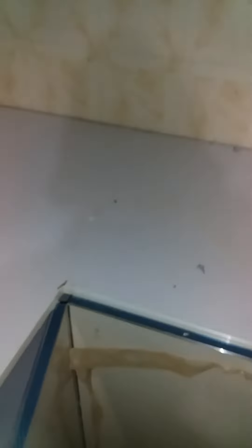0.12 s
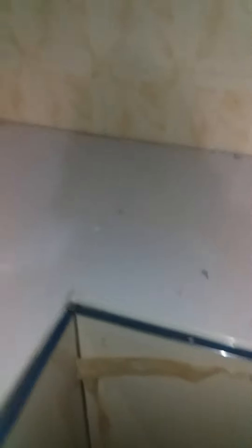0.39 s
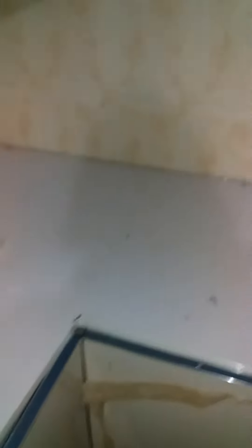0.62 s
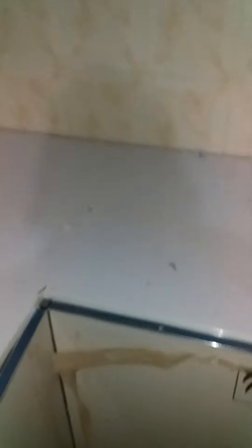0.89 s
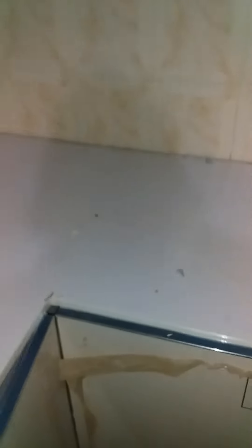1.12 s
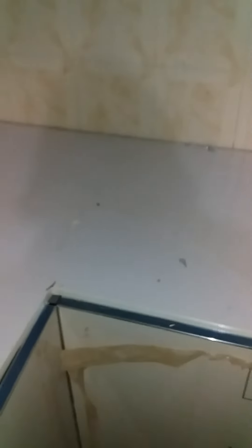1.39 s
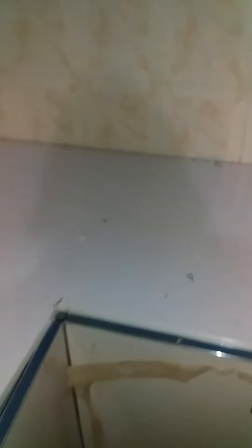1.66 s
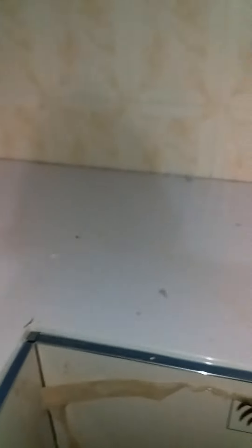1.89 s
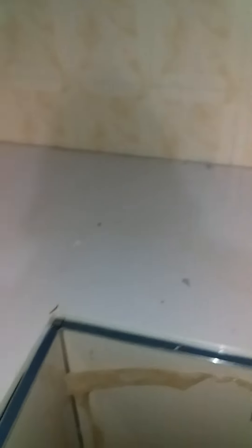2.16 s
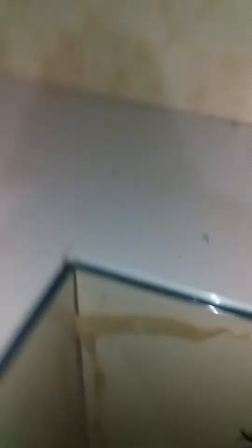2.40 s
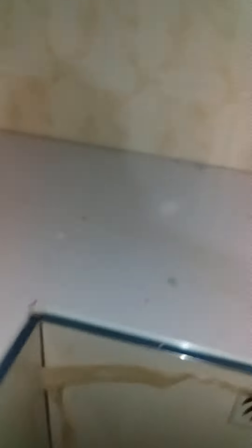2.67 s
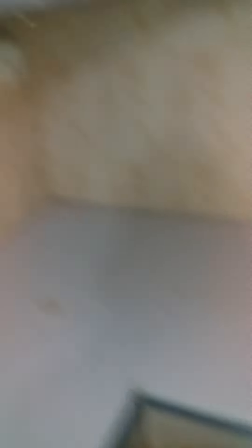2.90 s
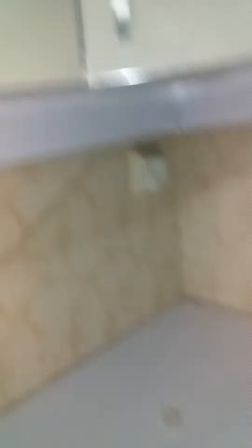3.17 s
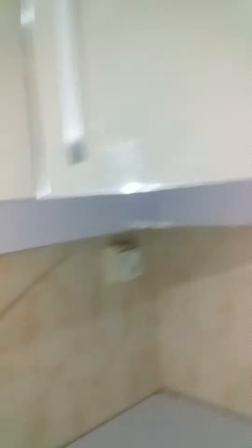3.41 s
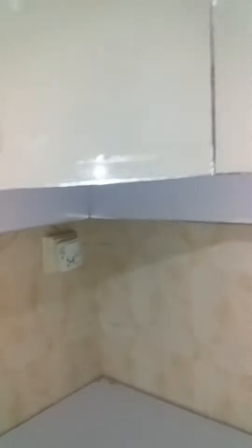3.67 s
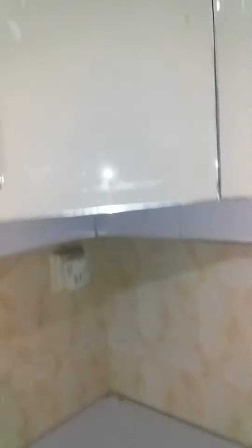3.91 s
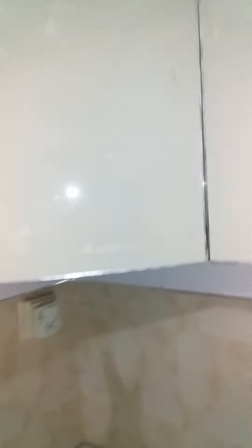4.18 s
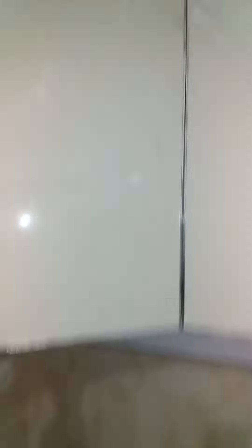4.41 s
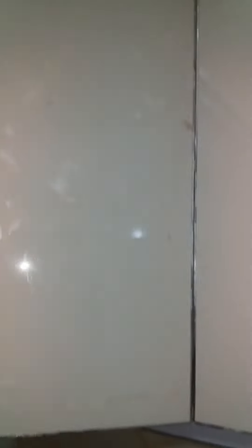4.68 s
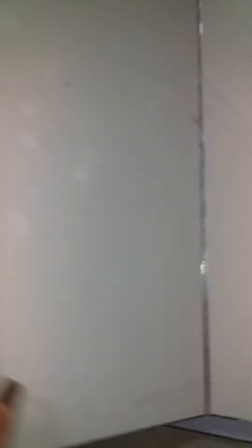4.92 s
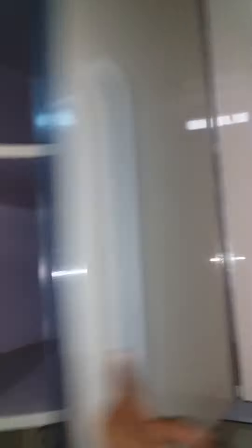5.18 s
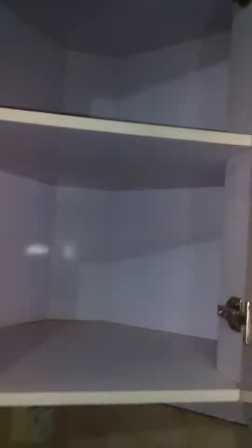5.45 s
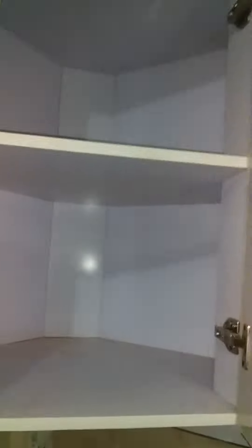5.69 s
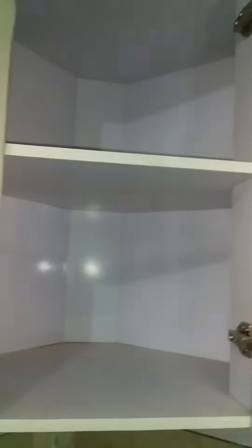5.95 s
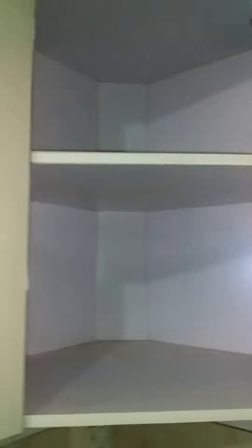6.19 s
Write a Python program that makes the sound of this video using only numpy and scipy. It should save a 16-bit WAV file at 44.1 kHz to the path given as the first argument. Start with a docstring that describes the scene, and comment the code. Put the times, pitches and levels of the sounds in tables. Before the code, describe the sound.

Cabinet doors knock hollowly in a bare kitchen, loud blows early, then cloth rustling with squeaks, light catch clicks and a final close rub.

```python
"""Cabinet doors knock shut and pop open in a bare, hard-walled kitchen, heard at one microphone.
Each blow is a burst of noise spread by the room, a hard bright edge, and decaying sine modes of the hollow box.
Between blows clothes and feet rustle close by, as shaped noise under rounded swells. Small things click (short
rings with a crack) and squeak (brief unsteady sines). A low sine wavers, and faint steady noise is the room's air."""
import sys
import numpy as np
from scipy import signal
from scipy.fft import rfft, irfft, next_fast_len
from scipy.io import wavfile
from scipy.ndimage import uniform_filter1d, map_coordinates

SR = 44100
rng = np.random.default_rng(int(sys.argv[2]) if len(sys.argv) > 2 else 0)


def field_ratio(decibels):
    """Amplitude ratio for a level in dB (20 dB per decade); scalars and array-likes work."""
    return 10 ** (np.asarray(decibels, dtype=float) / 20)


def persist_wave(psi):
    """Save psi, clipped to +-1, as 16-bit WAV."""
    counts = np.round(np.clip(psi, -1, 1) * 32767).astype(np.int16)
    wavfile.write(sys.argv[1], SR, np.atleast_2d(counts).T)


N = 278712  # length in samples


def unit(x):
    """Scale a sound to rms 1."""
    return x / np.sqrt(np.mean(x ** 2) + 1e-20)


def along(points, hz):
    """Read (Hz, value) points on a log frequency axis."""
    point_hz, value = np.transpose(points)
    return np.interp(np.log(hz + 1), np.log(point_hz + 1), value)


def wobble(rate):
    """A smooth random curve with rate knots a second."""
    knots = rng.standard_normal(int(N * rate / SR) + 4)
    return map_coordinates(knots, [np.arange(N) * rate / SR])


def filtered(x, response):
    """Multiply the spectrum of x by a response of frequency."""
    size = next_fast_len(x.shape[-1] + 8192)
    spectrum = rfft(x, size) * response(np.fft.rfftfreq(size, 1 / SR))
    return irfft(spectrum, size)[..., :x.shape[-1]]


def rush(colour, patchy_db, grainy_db):
    """Coloured noise of rms 1 with patches of random gain and a grainy fine envelope."""
    grain = field_ratio(grainy_db * wobble(400)) * rng.standard_normal(N)
    z = signal.stft(grain, nperseg=512)[2]
    field = uniform_filter1d(rng.standard_normal(z.shape), size=5, axis=0)  # across frequency
    field = uniform_filter1d(field, size=8, axis=1)  # across time
    patchy = signal.istft(z * field_ratio(patchy_db * unit(field)), nperseg=512)[1][:N]
    return unit(filtered(patchy, lambda hz: field_ratio(along(colour, hz))))


def swells(peak_s, db, rise_s, fall_s):
    """Gain of rounded swells added in power; rise and fall span 20 dB, their signs ignored, and 0 is silent."""
    late = np.arange(0, N + 64, 64) / SR - peak_s[:, None]  # one point every 64 samples
    rising = -late / np.abs(rise_s)[:, None]
    falling = late / np.abs(fall_s)[:, None]
    part = np.where(late < 0, rising, falling)
    power = np.sum(field_ratio(db[:, None] - 20 * part ** 1.236) ** 2, axis=0)  # the exponent rounds the top
    return np.interp(np.arange(N), np.arange(len(power)) * 64, np.sqrt(power))


def add(track, s, sound):
    """Mix a sound into the track at time s."""
    part = track[round(s * SR):][:len(sound)]
    part += sound[:len(part)]


# The kitchen's air and the microphone itself. Each row: frequency in Hz, relative level in dB.
AIR_COLOUR = [(15, -39.5), (25, -9.5), (82, 9.5), (144, -6.5), (307, -4.5), (572, -21), (1320, -9.5),
              (1820, -12.5), (2150, -7), (3130, -29), (8270, -17), (10800, -46.5), (15800, -25)]


def room_air():
    """Room air and microphone noise: steady coloured noise without patches or grain."""
    return field_ratio(-63.5) * rush(AIR_COLOUR, patchy_db=0, grainy_db=0)


# Swells of the low tone. Each row: peak time in seconds, pitch in Hz, level in dB,
# rise in seconds over 20 dB, fall in seconds over 20 dB.
TONE_SWELLS = [(3.23, 254, -51, 0.055, 0.25), (3.445, 248, -53.5, 0.11, 0.15),
               (3.72, 246.5, -52, 0.13, .15), (3.81, 248.5, -46.5, 0.14, 0.099),
               (4.025, 251.5, -57, .15, .04), (4.32, 251.8, -42, 0.23, 0.13),
               (4.62, 251.7, -47, .24, 0.065), (4.8, 250, -46.5, 0.044, 0.084)]


def low_tone():
    """One soft sine gliding between the listed pitches, with wavering level and phase."""
    peak_s, hz, db, rise_s, fall_s = np.transpose(TONE_SWELLS)
    cycles = np.cumsum(np.interp(np.arange(N) / SR, peak_s, hz)) / SR
    gain = swells(peak_s, db, rise_s, fall_s) * field_ratio(0.7 * wobble(30))
    return np.sqrt(2) * gain * np.sin(2 * np.pi * cycles + 0.5 * wobble(25))


# Brief narrow tones inside the rubbing. Each row: middle in seconds, pitch in Hz, peak level in dB,
# length in seconds between the points at 1/e of the peak.
SQUEAK_TONES = [(2.955, 1230, -41.5, 0.046), (3.014, 1413, -44, 0.06), (3.1, 1144, -41, 0.046),
                (3.376, 840, -41.5, 0.053), (3.454, 896, -50, 0.086), (4.156, 2050, -40.5, 0.055),
                (4.32, 445, -45, 0.23), (4.432, 178.5, -46, 0.069), (4.536, 162, -41.5, 0.16),
                (5.64, 232, -58.5, 0.15), (5.958, 1744, -37, 0.081), (6.116, 228.7, -45, .06),
                (6.178, 232, -44, 0.075)]


def squeaks():
    """Sines that swell and fade in a smooth bell, the phase unsteady."""
    out, t = np.zeros(N), np.arange(N) / SR
    for middle_s, hz, db, length_s in SQUEAK_TONES:
        bell = np.exp(-(2 * (t - middle_s) / length_s) ** 2)
        out += field_ratio(db) * bell * np.sin(2 * np.pi * hz * t + 0.85 * wobble(60))
    return out


# Steps and shifts of weight on the floor. Each row: peak time in seconds, scuff level in dB,
# rumble level in dB relative to the scuff, fall in seconds over 20 dB (sign ignored, 0 is silent).
FOOT_STEPS = [(0.005, -41.5, -1, 0.22), (.07, -48.5, -1.5, 0), (.17, -59, -15, 1.8), (.21, -67, -2, .04),
              (.74, -41.5, -1.5, 0.2053), (.89, -66, 4, 0.5), (1.257, -48.5, 10.5, 0.07),
              (1.77, -65, 2, -0.8), (1.83, -61, 9, 1.1), (2.58, -45, -10.5, 0.07), (2.87, -55.5, 2, 1),
              (3.14, -40.5, -6, 0.2), (3.25, -41.5, -13, -0.03), (3.37, -49.5, 2, .18), (3.54, -68, 8, 0.8),
              (3.66, -62, -1.5, 0.4), (3.79, -55, 1, 0.5), (3.9, -68, 22, 0), (4.03, -60.5, 5.5, 0.7),
              (4.08, -48, -6, 0.07), (4.31, -49.5, 1, 0.25), (4.43, -43.5, -12, 0.07),
              (4.56, -46.5, 3, 0.1), (4.67, -48.5, 3, 0.04), (4.79, -45.5, -7, 0.4),
              (4.93, -46, -13, -0.36), (5.004, -40.5, 2, -0.07), (5.08, -49.5, 3, 0.04),
              (5.37, -59.5, 9.5, 0.5), (5.52, -73, 16, -0.5), (5.62, -59.5, -3, -0.4),
              (5.869, -69, 10.5, 0.6), (5.96, -41.5, -3, 0.09), (6.1, -43, -7, 0.24),
              (6.29, -52.5, -11, 0.96)]
# Colour of the scuffing soles. Each row: frequency in Hz, relative level in dB.
SCUFF_COLOUR = [(76, -29), (130, -2.5), (248, 0.5), (280, 0), (447, -8), (600, -19.5), (780, -38.5),
                (1320, -120)]
# Colour of the rumble of steps and handling. Each row: frequency in Hz, relative level in dB.
RUMBLE_COLOUR = [(18, -57), (30, -22), (42, -22), (59, -1), (75, 3.5), (140, -17), (180, -36), (310, -120)]


def feet():
    """Feet scuff as mid-low noise, and steps and handling rumble below on the same swells."""
    peak_s, db, rumble_db, fall_s = np.transpose(FOOT_STEPS)
    rise_s = 0.63 * fall_s
    scuff = swells(peak_s, db, rise_s, fall_s) * rush(SCUFF_COLOUR, patchy_db=3.5, grainy_db=0.6)
    rumble_gain = swells(peak_s, db + rumble_db, rise_s, fall_s)
    return scuff + rumble_gain * rush(RUMBLE_COLOUR, patchy_db=-0.9, grainy_db=-1.5)


# Strokes of cloth close by. Each row: peak time in seconds, rustle level in dB,
# fine hiss level in dB relative to the rustle, rise in seconds over 20 dB, fall in seconds over 20 dB.
CLOTH_STROKES = [(0.02, -50, -6.5, 0.12, 0.32), (.81, -54.5, -3, .15, 0.21), (.946, -56, 6.5, 0.065, 0.1),
                 (1.2, -54.5, 4, 0.056, 0.13), (1.8, -73, 11.5, 0.054, 0.11), (2.6, -68, 8.5, 0.16, 0.21),
                 (2.82, -49.5, -1.5, 0.17, 0.25), (2.885, -46.5, -14, .04, .03),
                 (2.98, -40, -5.5, 0.12, 0.38), (3.14, -41.5, -6, 0.41, 0.39),
                 (3.33, -44, -6.5, 0.24, 0.24), (3.57, -61.5, 9, 0.056, 0.29),
                 (3.8, -47.5, -0.3, .25, 0.32), (4.13, -38.5, -3.5, 0.22, 0.37),
                 (4.33, -42, -0.9, 0.23, 0.17), (4.57, -52, -2, 0.14, 0.26), (4.67, -56.5, 7.5, 0.19, 0.19),
                 (4.96, -45.5, -12, 0.067, 0.098), (5.03, -47, -9, .1, 0.22), (5.33, -63, -0.5, .1, 0.3),
                 (5.6, -68.5, 1, .15, 0.17), (5.888, -51.5, -11, 0.0094, .1),
                 (5.953, -32.5, -8, 0.054, 0.14), (6.02, -40, -15, .08, 0.12), (6.1, -43, -11.5, .12, 0.25),
                 (6.22, -49.5, -13, 0.07, 0.22)]
# Colour of the cloth's body. Each row: frequency in Hz, relative level in dB.
RUSTLE_COLOUR = [(150, -36), (250, -10), (282, -16.5), (449, -6.5), (634, -7), (1080, -3.5), (2020, -8),
                 (2490, -13), (6000, -21.5), (7800, -48), (13200, -120)]
# Colour of the cloth's fine hiss. Each row: frequency in Hz, relative level in dB.
HISS_COLOUR = [(1760, -8.5), (3000, -4.5), (3750, -4.5), (4400, -4.5), (5200, -3.5), (7350, -5.5),
               (8340, -3.5), (10100, -19.5), (12500, -15.5), (15800, -21.5)]


def cloth():
    """Rubbing cloth: rustle and fine hiss are two noises that flutter together."""
    peak_s, db, hiss_db, rise_s, fall_s = np.transpose(CLOTH_STROKES)
    flutter = wobble(25.017)
    rustle_gain = swells(peak_s, db, rise_s, fall_s) * field_ratio(1.1 * flutter)
    hiss_gain = swells(peak_s, db + hiss_db, rise_s, fall_s) * field_ratio(1.2 * flutter)
    rustle = rustle_gain * rush(RUSTLE_COLOUR, patchy_db=2.5, grainy_db=0.5)
    return rustle + hiss_gain * rush(HISS_COLOUR, patchy_db=2.3, grainy_db=0.85)


# Hard edge of a contact, for doors and clicks alike. Each row: frequency in Hz, relative level in dB.
EDGE_COLOUR = [(1800, -20.5), (3000, 2.5), (5480, -5), (6060, -5.5), (6530, -8), (7900, -7), (10400, -27),
               (13100, -32.5), (15800, -36.5)]


def edge_colour_db(hz):
    """Hard surfaces meeting excite mostly the treble."""
    return along(EDGE_COLOUR, hz)


# Dry clicks of catches and small contacts. Each row: start in seconds, level in dB, pitch in Hz,
# life in cycles to 1/e, starting level of the crack in dB relative to the ring.
CLICKS = [(1.282, -38, 950, 6, -30), (1.533, -34, 1900, 6, -20), (2.237, -19, 1900, 4, -20),
          (2.344, -22, 1800, 6, -18), (2.351, -8, 2200, 7, -15), (2.535, -52, 9000, 3, 2),
          (2.553, -51, 11000, 3, 2), (2.783, -33, 1380, 2.5, 2), (2.797, -42, 2500, 2, 0),
          (2.815, -27, 1420, 2.5, -3), (2.883, -27, 480, 1.6, -5), (3.782, -37, 1510, 3.5, -3),
          (4.83, -27, 900, 6, -22), (4.872, -30, 520, 14, -30), (5.111, -25, 950, 7, -15),
          (5.193, -29, 2600, 4, -4)]


def ticks():
    """Dry clicks: a sine dying within a few cycles, with a crack of hard noise on top."""
    out, t = np.zeros(N), np.arange(SR // 10) / SR
    for s, db, hz, cycles, crack_db in CLICKS:
        ring = np.sin(2 * np.pi * hz * t) * np.exp(-t * hz / cycles) * (1 - np.exp(-t / 0.00035))
        crack = unit(filtered(rng.standard_normal(len(t)), lambda f: field_ratio(edge_colour_db(f))))
        crack *= field_ratio(crack_db - 60 * t / 0.0033)
        add(out, s, field_ratio(db) * (ring + crack))
    return out


# Reverberation of the bare kitchen. Each row: frequency in Hz, time to fall 60 dB in seconds.
ROOM_DECAY = [(400, 0.74), (1100, 0.53), (2900, 0.55), (7700, 0.46), (14000, 0.52)]


def in_room(t, response, contact_s, direct_db):
    """A short contact and the room's answer, each frequency dying at its own speed; rms 1 over the first 30 ms."""
    noise = filtered(rng.standard_normal(len(t)), response)
    hz, frame_s, z = signal.stft(noise, SR, nperseg=256)
    decay = field_ratio(-60 * frame_s / along(ROOM_DECAY, hz)[:, None])
    tail = signal.istft(z * decay, SR, nperseg=256)[1][:len(t)]
    build_up = 1 - np.exp(-t / 0.0018)  # echoes pile up
    direct = field_ratio(direct_db) * noise * field_ratio(-60 * t / contact_s) * (1 - np.exp(-t / 0.0036))
    sound = tail * build_up + direct
    return sound / np.sqrt(np.mean(sound[:round(0.03 * SR)] ** 2))


# Broad colour of the knock. Each row: frequency in Hz, relative level in dB.
KNOCK_COLOUR = [(240, -14.5), (400, 2), (559, -11), (637, -8.5), (705, -5), (908, -10), (985, -10),
                (1860, -7.5), (4500, -32.5), (5850, -47.5), (9900, -120)]


def door_knock(t):
    """The diffuse knock: noise of a short contact, spread by the room."""
    return in_room(t, lambda f: field_ratio(along(KNOCK_COLOUR, f)), contact_s=0.02, direct_db=-7)


def door_edge(t, edge_db):
    """The hard edge of the contact: a weak edge is also a dull one."""
    tilt_db = 0.97 * (max(edge_db, -35) + 25.5)  # per octave above 7 kHz

    def response(f):
        return field_ratio(edge_colour_db(f) + tilt_db * np.log2(np.maximum(f / 7000, 1)))
    return in_room(t, response, contact_s=0.0069, direct_db=6.5)


# Modes of door panel and hollow cabinet. Each row: frequency in Hz, relative level in dB,
# time to fall 60 dB in seconds.
BOX_MODES = [(64, 4, 0.63), (87.1, 3.5, 0.75), (112.6, -1, 0.68), (151.6, 3.5, 0.48), (170, -5.5, 0.82),
             (184.3, 5, 0.43), (210.6, 0, 0.48), (234, -1.5, 0.8), (259.4, -1, 0.69), (293, 3, 0.8),
             (328.8, 2.5, 0.64), (371, 0, 0.5), (428.8, 2.5, 0.43), (550, -6, 0.81), (633, -2, 0.4),
             (818, -3.5, 0.25), (916, 0, 0.55), (1028, -6, 0.22), (1124, -10.5, 0.7), (1347, -7, 0.53),
             (1500, -4, 0.51), (1560, -13, 0.76), (1655, -1.5, 0.38), (1870, -17.5, .4), (1905, -13, 0.42),
             (1900, -6.5, 0.22), (2207, -12, 0.65), (2343, -4.5, 0.43), (2485, -9.5, 0.79),
             (2916, -14, 0.4)]


def hollow_box(t, boom_db, thud_hz):
    """Decaying modes of box and panel set going together, and the door's own bend."""
    hz, level_db, t60 = np.transpose(BOX_MODES)[:, :, None]
    low = hz < 500
    thud_db = 3 + 0.44 * boom_db  # more boom brings more thud
    near_db = np.maximum(-25 * np.log2(hz / thud_hz) ** 2, -12)  # where the door is struck favours some modes
    reach_db = -1.2 * (boom_db + 5.5) * np.log2(hz / 80)  # a blow that shakes the whole box reaches deeper
    # boom below 130 Hz, thud below 500 Hz, panel above
    family_db = np.select([hz < 130, low], [boom_db + 4 + reach_db, thud_db + near_db], -11.5)
    strength_db = family_db + level_db + np.where(low, 1.2, 3.5) * rng.standard_normal(hz.shape)
    late = np.maximum(t - 0.005, 0)  # the edge touches first, the weight of the door lands after
    swell = 1 - np.exp(-(np.where(low, late, t) * hz) ** 2)  # a mode takes a cycle or two to speak
    first = 1 + 0.54 * np.exp(-t / 0.028)  # the wood itself dies quickly, the room carries on
    walk = uniform_filter1d(rng.standard_normal((len(hz), len(t))), size=30)
    walk = uniform_filter1d(walk, size=30)
    drift = 3.95 * (hz / 200) ** 0.597 * np.cumsum(walk, axis=1) / np.sqrt(SR)  # echoes blur each mode
    gain = field_ratio(strength_db - 60 * t / t60) * swell * first
    modes = np.sum(gain * np.sin(2 * np.pi * hz * t + drift), axis=0)
    flex = late * thud_hz / 1.6  # the door itself bends for a few cycles
    bend = np.e * flex * np.exp(-flex) * np.sin(2 * np.pi * thud_hz * t)
    return modes + field_ratio(thud_db + 8) * bend


# Door blows. Each row: start in seconds, level of the whole blow in dB, relative strength of the boom in dB,
# centre of the thud in Hz, relative strength of the hard edge in dB.
DOOR_BLOWS = [(0.261, -48.5, 0.5, 321, -36), (0.387, -8.5, -11, 214, -29), (0.467, -17, -12.5, 176, -26.5),
              (0.519, -23, -3.5, 230, -19.5), (0.601, -36.5, -12, 234, -72), (1.281, -30.5, -1.5, 218, -55),
              (1.535, -28.5, -19.5, 278, -14.5), (1.852, -12, -15.5, 236, -25.5),
              (1.9, -17, -5.5, 213, -35), (2.209, -22.5, 3.5, 96, -28), (2.236, -14.5, 3.5, 250, -27),
              (2.35, -12.5, -7.5, 212, -16.5), (4.74, -40, -21, 184, -23), (4.828, -23, -20, 162.4, -18.5),
              (5.111, -24, -18, 164.5, -13.5), (5.192, -34.5, -48, 151, -13)]


def doors():
    """Every blow sums a diffuse knock, a hard edge and the ringing box."""
    out, t = np.zeros(N), np.arange(SR) / SR
    for s, db, boom_db, thud_hz, edge_db in DOOR_BLOWS:
        knock = field_ratio(-12) * door_knock(t)
        edge = field_ratio(edge_db - 2) * door_edge(t, edge_db)
        box = field_ratio(-7) * hollow_box(t, boom_db, thud_hz)
        add(out, s, field_ratio(db) * (knock + edge + box))
    return out


def scene():
    """Everything in the kitchen at one microphone."""
    background = room_air() + low_tone()
    close_by = squeaks() + feet() + cloth() + ticks()
    return (background + close_by + doors())[None]


def top_cut(x):
    """Nothing passes above the cut-off."""
    return signal.sosfilt(signal.butter(12, 16260, fs=SR, output="sos"), x)


def record(dry):
    """The microphone drops the deepest bass; loud peaks are softly held and the very top is cut."""
    heard = signal.sosfilt(signal.butter(4, 52, "high", fs=SR, output="sos"), dry)
    held = heard / (1 + np.abs(heard / 1.1) ** 6) ** (1 / 6)  # peaks bend towards 1.1
    mix = filtered(held, lambda hz: hz < 15850)
    return top_cut(mix)


dry = scene()
out = record(dry)
persist_wave(out)
```